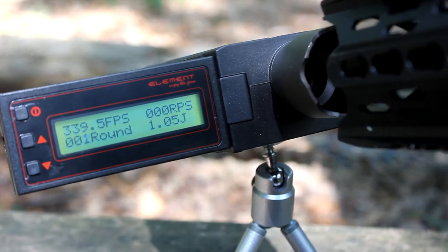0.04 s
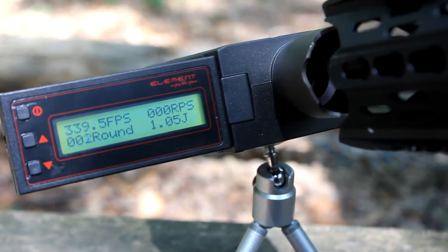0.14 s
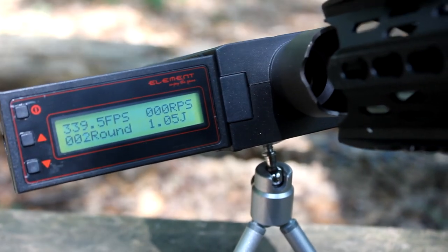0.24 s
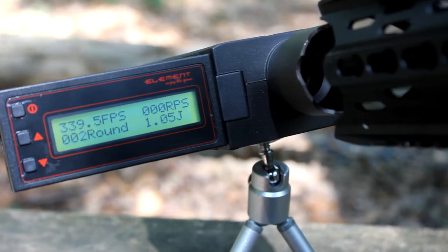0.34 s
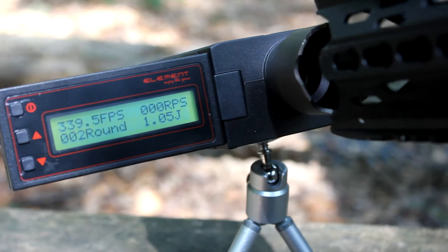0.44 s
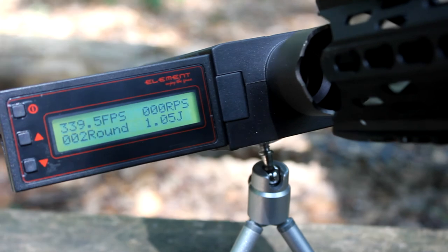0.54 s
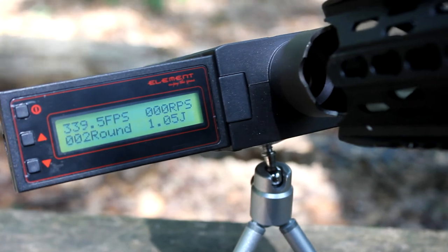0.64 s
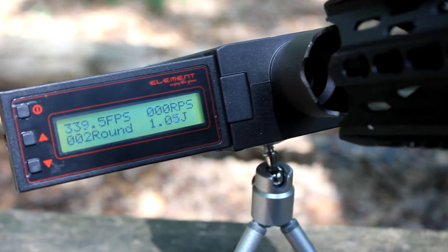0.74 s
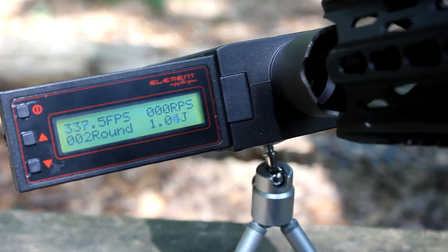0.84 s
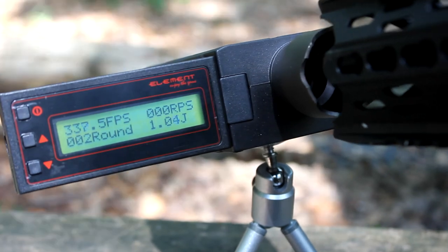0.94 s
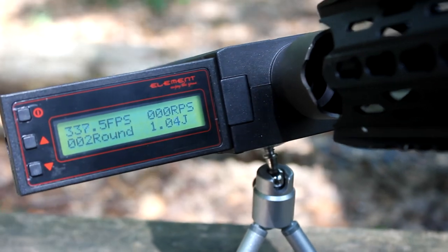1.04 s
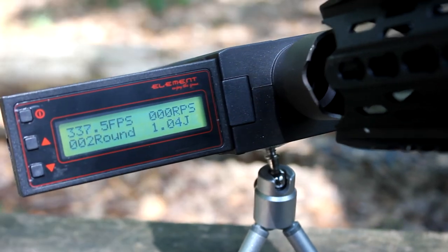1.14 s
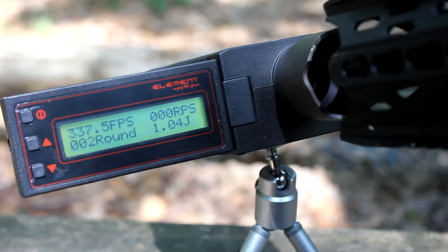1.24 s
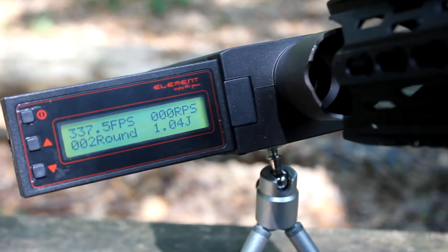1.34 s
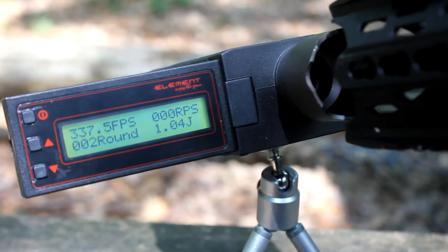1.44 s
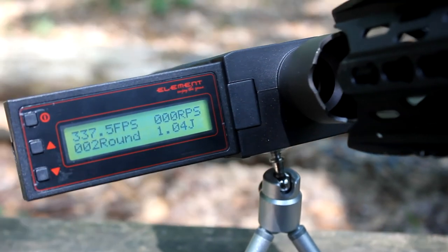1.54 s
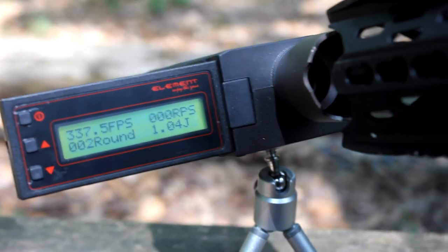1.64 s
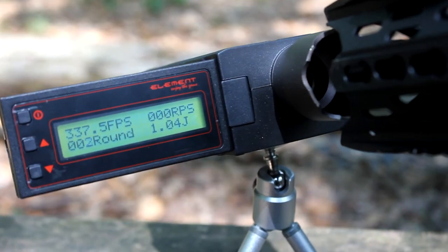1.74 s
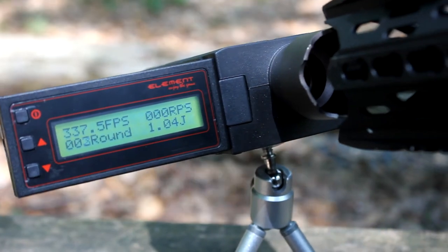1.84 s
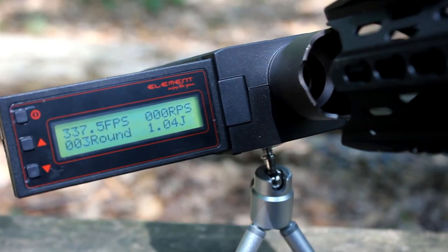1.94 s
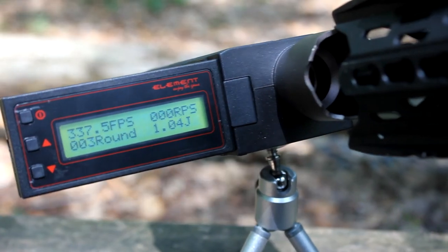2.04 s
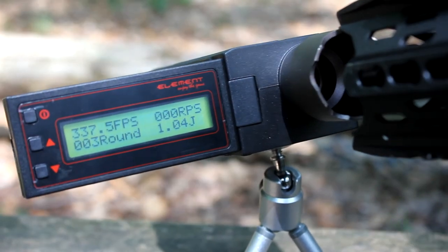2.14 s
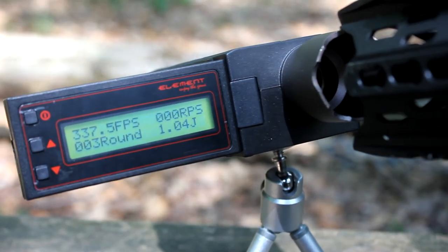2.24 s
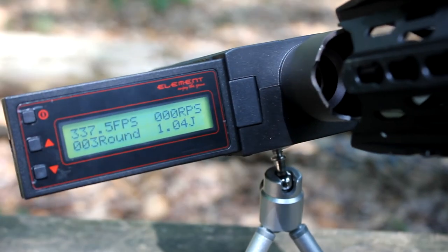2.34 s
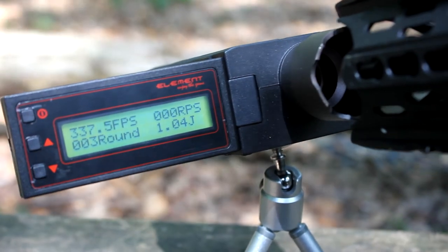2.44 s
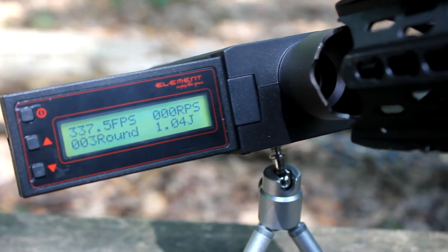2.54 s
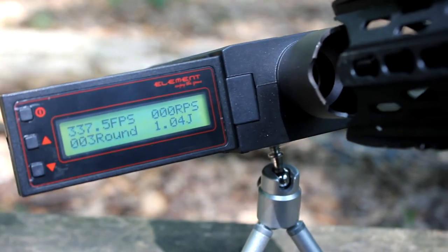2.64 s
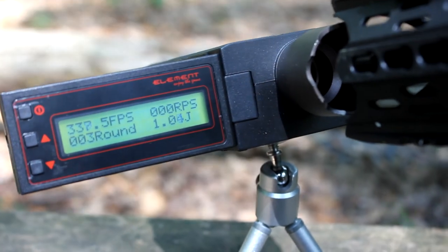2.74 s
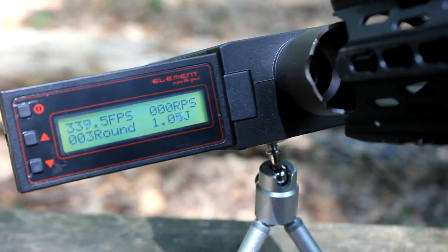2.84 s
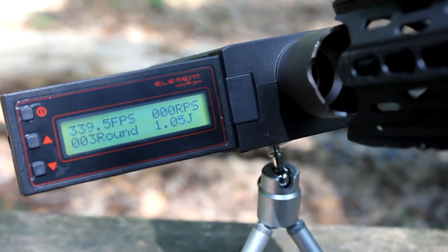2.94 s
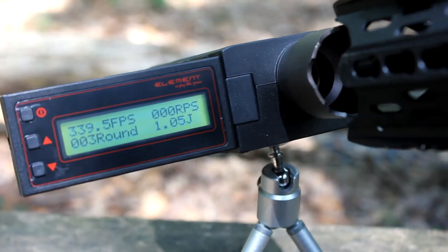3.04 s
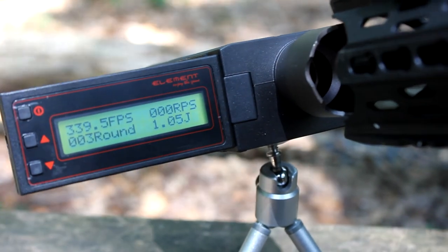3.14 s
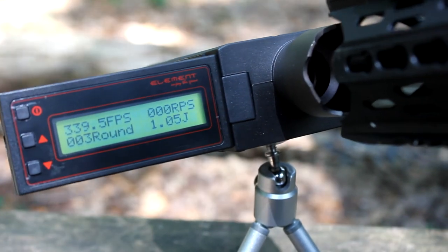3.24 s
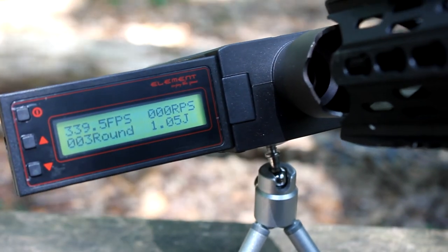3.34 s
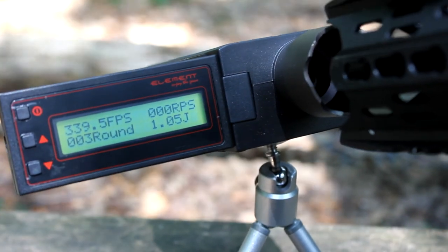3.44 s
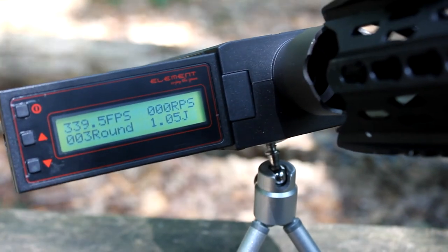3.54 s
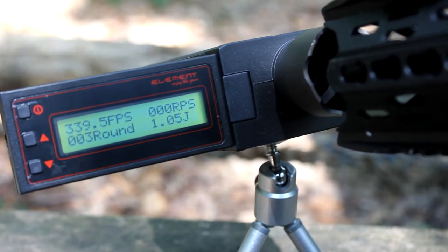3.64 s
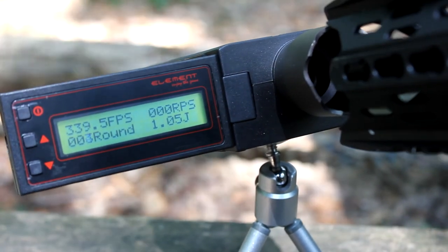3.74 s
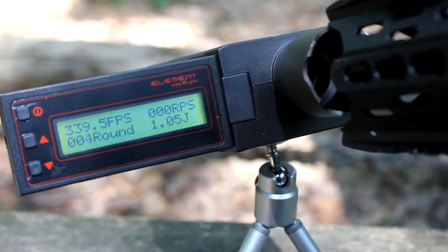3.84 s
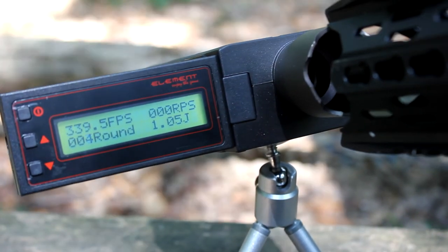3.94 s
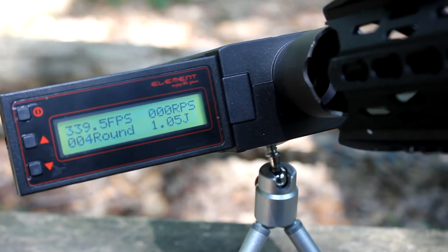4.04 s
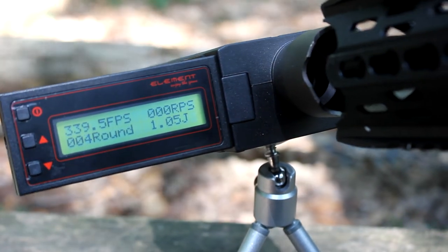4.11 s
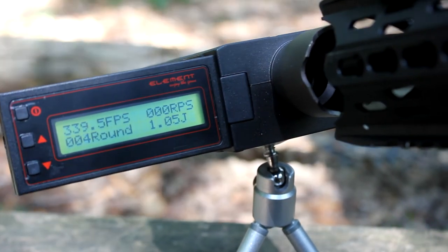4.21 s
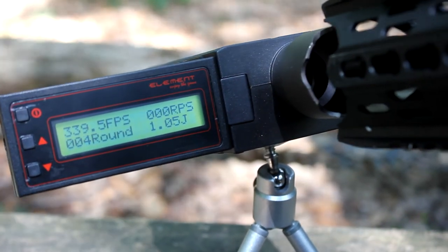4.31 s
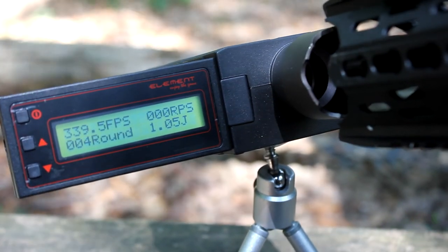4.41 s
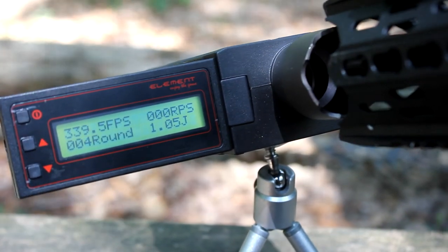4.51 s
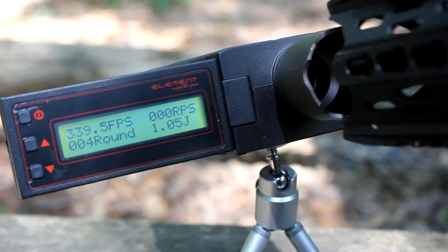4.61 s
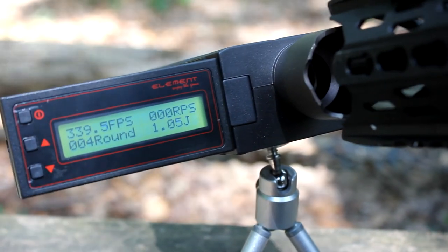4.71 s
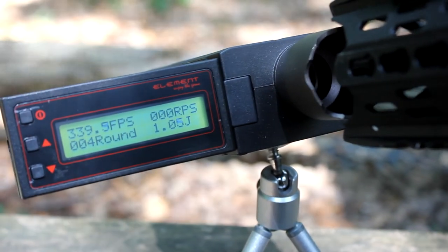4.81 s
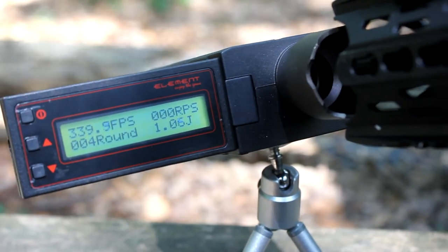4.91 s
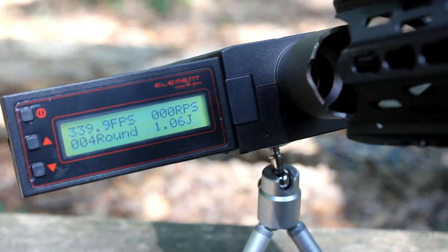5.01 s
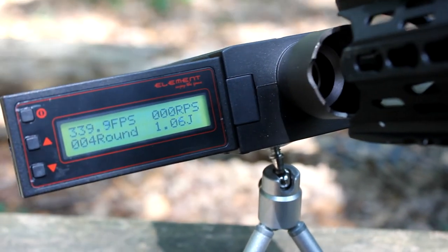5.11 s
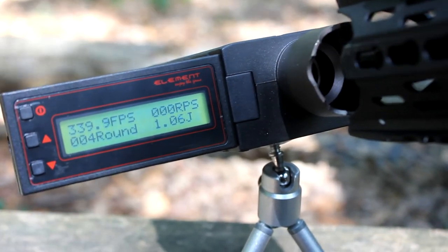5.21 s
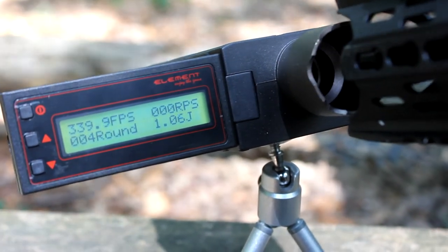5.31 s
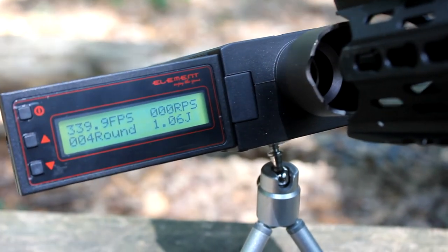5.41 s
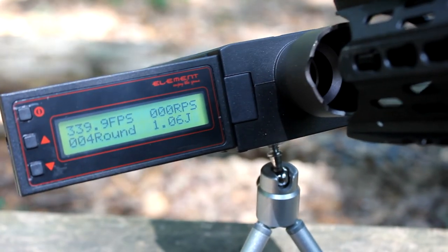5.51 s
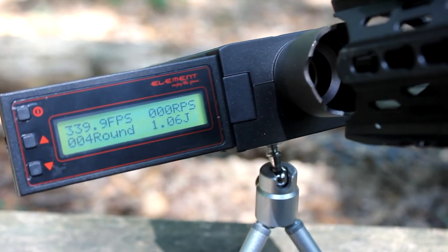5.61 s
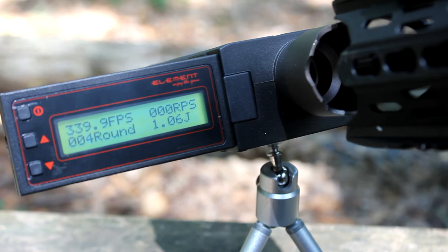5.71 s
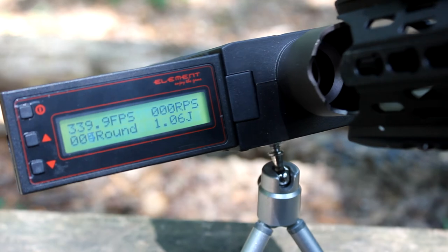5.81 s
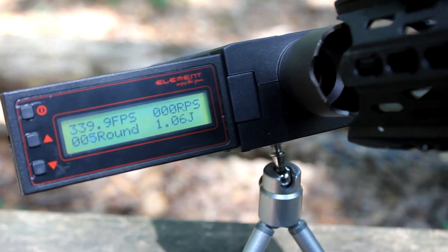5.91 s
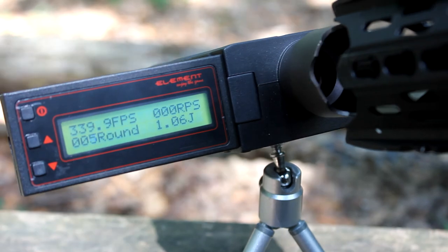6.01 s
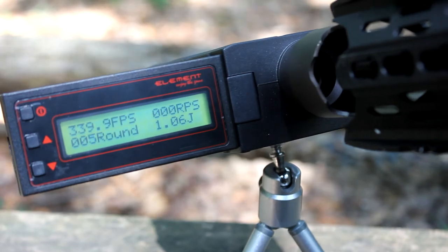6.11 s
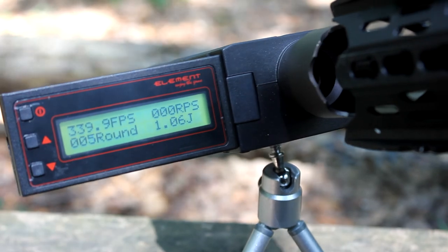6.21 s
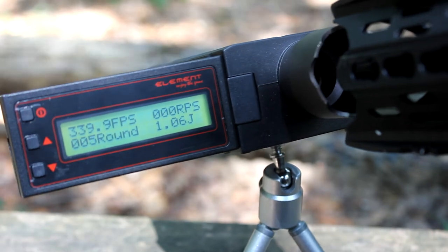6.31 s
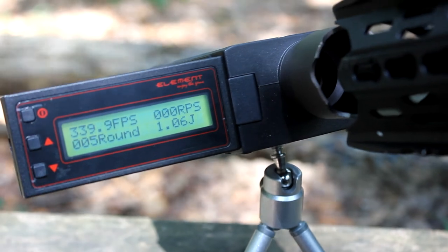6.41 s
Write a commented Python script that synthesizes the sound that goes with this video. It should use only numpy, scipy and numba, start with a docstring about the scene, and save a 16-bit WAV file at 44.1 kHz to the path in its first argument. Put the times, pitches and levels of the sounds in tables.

```python
"""Electric airsoft rifle in a wood.

Four single shots, close by. In each the motor spins up, gears whine as they draw the piston,
the piston slams home, the pellet hits a backstop, the gears coast and the leaves return a hiss.
Around them: breeze in the leaves, a distant motor, birds, ticks from handling the rifle.
The camera rumbles and bumps in the hand; its gain control ducks on each shot, then recovers."""
import sys
import numpy as np
from scipy import signal
from scipy.fft import rfft, irfft
from scipy.io import wavfile
from scipy.ndimage import uniform_filter1d
from numba import njit

SR = 44100
rng = np.random.default_rng(int(sys.argv[2]) if len(sys.argv) > 2 else 0)


def int16_out(signal):
    """Quantize to a 16-bit WAV file."""
    q = np.round(np.clip(np.atleast_2d(signal).T, -1, 1) * 32767)
    wavfile.write(sys.argv[1], SR, q.astype(np.int16))


N = 284886
TIME = np.arange(N) / SR

# leaf hiss spectrum: freq_hz, gain_db
LEAF_SPECTRUM = [(18, -63.5), (30, -44), (66, -15), (114, -12.5), (156, -3.5), (187, -6), (315, -5.5),
                 (341, -6), (546, -10.5), (691, -10.5), (830, -11), (1260, -11), (5040, -12),
                 (12300, -27.5), (15500, -30.5)]
# hand rumble spectrum: freq_hz, gain_db
RUMBLE_SPECTRUM = [(20, -15.5), (45, -1.5), (90, 2.5), (160, -8), (300, -20), (700, -43)]
# grip shifts: centre_s, half_width_s, level_db
GRIPS = [(2.25, .2, -50), (4.0, 0.3, -42), (4.79, 0.042, -30.5), (5.07, 0.13, -38.5), (5.6, 0.46, -55.5)]
# soft bumps on the camera: start_s, level_db, pitch_hz
BUMPS = [(1.842, -28.5, 120), (2.103, -28, 144), (2.23, -30, 132), (2.335, -36, 109), (2.965, -35, 85),
         (3.674, -25.5, 94), (3.935, -29.5, 130), (3.96, -17.5, 110), (4.105, -20, 148), (4.197, -29, 113),
         (4.982, -26.5, 109), (5.037, -23.5, 150), (5.065, -27, 170), (5.445, -35, 55.3), (5.61, -35, 58.7),
         (5.9, -39, 76.6)]
# shots: strike_s, gearbox_db, speed_ratio, cycle_length_ratio, pellet_round_trip_s, pellet_db
SHOTS = [(.6085, 1.5, .99, .985, .0226, 2.5), (2.551, 3, 1.017, 1.015, .0229, 3),
         (4.6307, 1.5, 1.0, .985, .0225, .5), (6.369, 2, 1.005, 1.0, .0228, 1.5)]
# body radiation of the tooth harmonics: freq_hz, gain_db
WHINE_SPECTRUM = [(250, -14), (550, -7), (850, 4), (980, 2), (1130, -11), (1570, -10.5), (2000, -13),
                  (2250, -13), (2600, -3), (3200, -1), (3600, 1), (4100, -1), (4750, -5.5), (5400, -11),
                  (6250, -7.5), (7800, -22)]
# sliding teeth and brushes: freq_hz, gain_db
RASP_SPECTRUM = [(30, -38.5), (120, -14), (400, -18), (600, -11), (900, 1.5), (1400, 0), (2300, 3.5),
                 (3700, 4), (5500, 3), (7000, -8.5), (9500, -12.5), (13500, -3.5), (16000, -9)]
# gearbox blows: from_strike_s, level_db, t60_s, lowpass_hz
BLOWS = [(-.0862, -23.5, 0.079, 1500), (-.0085, -9, 0.03, 1090), (-.0058, -9, 0.019, 5940),
         (-.0016, 9.5, 0.014, 12800), (.0035, 2.5, 0.0078, 11000), (0.0329, -26, 0.017, 3000),
         (0.0944, -25, 0.026, 1100)]
# gearbox shell modes: freq_hz, level_db
SHELL_MODES = [(290, -1), (760, 4), (1080, -2), (1260, -8), (1560, 7), (1920, -5), (2300, -2), (2950, -55),
               (3550, 14.5), (4080, 9.5), (4700, -7.5), (5300, 3), (6300, -42), (11800, 11)]
# crack of a blow: freq_hz, gain_db
CRACK_SPECTRUM = [(30, -65.5), (100, -23), (300, -10), (550, -9.5), (1100, -5), (2300, 1), (4500, 4.5),
                  (7000, -5.5), (10000, -10), (12000, -2), (16000, -24)]
# pellet impact: freq_hz, gain_db
PELLET_SPECTRUM = [(200, -14), (1500, -23), (2000, -4), (2350, -10), (2850, -1.5), (3250, 5), (3800, 2.5),
                   (4700, 1.5), (6500, -3), (9000, -12), (12000, -10), (16000, -25)]
# rebounding pellet lands: start_s, tick_db, ring_hz, ring_db
REBOUNDS = [(.7262, -15.5, 1250, -15.5)]
# scatter off trunks and leaves, mostly treble: freq_hz, gain_db
SCATTER_SPECTRUM = [(150, -23), (900, -8), (2000, -6), (3600, 0), (5500, -6), (8000, -10.5), (15000, -26)]
# near birds, single whistles: start_s, length_s, start_hz, end_hz, level_db
CHIRPS = [(1.071, 0.088, 6800, 6570, -47), (1.167, 0.082, 4670, 4510, -41.5),
          (1.3, 0.035, 3650, 4070, -38.5), (1.328, 0.028, 4050, 4025, -36.5),
          (1.435, .039, 3650, 4500, -37), (1.883, .04, 5500, 6010, -41), (2.071, .045, 4250, 3090, -43)]
# rifle handling ticks: start_s, level_db, ring_hz
TICKS = [(2.318, -45, 11000), (2.391, -33, 15500), (3.338, -43, 10900), (4.267, -44, 11000),
         (5.51, -44, 11000)]
# far bird, a sinking run of syllables: start_s, foot_hz, slur_db, low_note_db
SYLLABLES = [(4.899, 4430, -45.5, -43), (5.045, 4420, -48.5, -41), (5.185, 4270, -44, -43),
             (5.313, 4070, -41.5, -35), (5.458, 3497, -40, -34.5), (5.585, 3256, -37, -37),
             (5.725, 3100, -37, -39.5), (5.86, 2900, -35, -41), (6.004, 2730, -33.5, -45),
             (6.13, 2696, -34, -42)]

# nominal gearbox cycle, piston strike at 0; each shot scales its length and speed
START_S, PICKUP_S, RELEASE_S, CUTOFF_S, OVERRUN_S = -.086, -.0745, -.0125, .026, .0493
FIRST_TOOTH_HZ, FULL_TOOTH_HZ = 195, 1605
TOP_HZ = 15900


def undb(db):
    """Decibels to gain."""
    return 10 ** (np.asarray(db) / 20)


def unit(x):
    """Scale to rms 1."""
    return x / np.sqrt(np.mean(x ** 2))


def response(spectrum, hz):
    """Gain of a (freq_hz, gain_db) table at hz."""
    freq_hz, gain_db = np.transpose(spectrum)
    return undb(np.interp(np.log(np.maximum(hz, 1)), np.log(freq_hz), gain_db))


def convolve(x, kernel):
    """Convolve with the kernel scaled to unit energy."""
    return signal.fftconvolve(x, kernel / np.linalg.norm(kernel))[:len(x)]


def colour(x, spectrum, taps=2048):
    """Minimum-phase filter; white noise keeps its power."""
    cepstrum = irfft(np.log(response(spectrum, np.arange(taps // 2 + 1) * SR / taps)))
    causal = np.r_[cepstrum[0], 2 * cepstrum[1:taps // 2]]
    return convolve(x, irfft(np.exp(rfft(causal, taps))))


def lowpass(x, hz, order):
    """Maximally flat low-pass."""
    return signal.sosfilt(signal.butter(order, hz, fs=SR, output="sos"), x)


def walk(rate_hz, size):
    """Smooth random drift, spread near 1."""
    step = max(int(SR / rate_hz), 1)
    stairs = np.repeat(rng.standard_normal(size // step + 2), step)
    return unit(uniform_filter1d(stairs, step))[:size]


def chatter(size):
    """Micro-contacts: equal strength, random sign."""
    return np.sign(rng.standard_normal(size))


def fade(t, t60_s):
    """Exponential decay from t = 0."""
    return (t >= 0) * np.exp(-np.log(1000) * np.maximum(t, 0) / t60_s)


def gate(t, on_s, off_s, attack_s, t60_s):
    """Ramp from on_s, hold, decay from off_s."""
    return np.clip((t - on_s) / attack_s, 0, 1) * fade(np.maximum(t - off_s, 0), t60_s)


def swell(t, centre_s, half_width_s):
    """Bell curve, peak 1."""
    return np.exp(-((t - centre_s) / half_width_s) ** 2)


def add(out, start_s, x):
    """Mix x into out at start_s."""
    i = int(start_s * SR)
    out[i:i + len(x)] += x[:max(N - i, 0)]


def leaves(gust_db=-40.5, lull_db=-45, drop_s=2.26, drop_width_s=.45, sway_db=.28):
    """Leaves hiss in a breeze that drops once, gust to lull."""
    drop = (1 + np.tanh((TIME - drop_s) / (2 * drop_width_s))) / 2
    breeze_db = gust_db + (lull_db - gust_db) * drop
    hiss = colour(rng.standard_normal(N), LEAF_SPECTRUM)
    return hiss * undb(breeze_db - sway_db * walk(4.66, N))


def distant_motor(pitch_hz=161.5, drift=.011, level_db=-51, sway_db=2):
    """A wavering hum swells and fades."""
    hz = pitch_hz * (1 + drift * walk(32, N))
    hum = unit(np.sin(2 * np.pi * np.cumsum(hz) / SR))
    return hum * swell(TIME, centre_s=2, half_width_s=1.58) * undb(level_db + sway_db * walk(3.8, N))


def camera_handling(rest_db=-56, flutter_db=3, scuff_db=-16, scuff_hz=320, rise_cycles=.41):
    """Fluttering rumble swells as the grip shifts; dull bumps of a cycle or two scuff a little."""
    grip = undb(rest_db) + sum(undb(db) * swell(TIME, s, width_s) for s, width_s, db in GRIPS)
    rumble = unit(colour(rng.standard_normal(N), RUMBLE_SPECTRUM))
    out = rumble * grip * undb(flutter_db * (walk(25, N) - .5))
    t = TIME[:SR // 10]
    for start_s, db, hz in BUMPS:
        scuff = undb(scuff_db) * unit(lowpass(rng.standard_normal(len(t)), scuff_hz, order=4))
        rise = t * hz / rise_cycles
        envelope = rise * np.exp(1 - rise)
        add(out, start_s, undb(db) * envelope * (np.sin(2 * np.pi * hz * t) + scuff))
    return out


def rifle_motor(t, spin_up_s=.057, sag_hz=60, coast_tau_s=.041):
    """Nominal tooth rate and spring draw (0-1): spin up, sag against the spring, run free, coast."""
    draw = np.clip((t - PICKUP_S) / (RELEASE_S - PICKUP_S), 0, 1)
    spun = np.sin(np.pi / 2 * np.clip((t - START_S) / spin_up_s, 0, 1))
    strain = draw ** 2 * np.clip(t / RELEASE_S, 0, 1)
    driven_hz = FIRST_TOOTH_HZ + (FULL_TOOTH_HZ - FIRST_TOOTH_HZ) * spun - sag_hz * strain
    coast = np.exp(-np.maximum(t - CUTOFF_S, 0) / coast_tau_s)
    return driven_hz * coast, draw


def gear_load(t, tooth_hz, draw, drawn_db=-10.5, slack_db=-6.5):
    """Whine and rasp gains: gears run free, draw the spring, let the piston slide, overrun the motor."""
    free = (t >= START_S) * (tooth_hz / FULL_TOOTH_HZ) ** .59
    free *= fade(np.maximum(t - OVERRUN_S, 0), t60_s=.14)
    driven = gate(t, START_S, RELEASE_S, attack_s=.009, t60_s=.05)
    drawing = gate(t, PICKUP_S, RELEASE_S, attack_s=.0024, t60_s=.05)
    sliding = gate(t, RELEASE_S, off_s=.0033, attack_s=.0088, t60_s=.031)
    overrun = swell(t, OVERRUN_S, half_width_s=.015)
    spring_db = drawn_db + slack_db * (1 - draw)
    whine = undb(-43) * free + undb(spring_db) * driven + undb(-22.5) * overrun
    rasps = [undb(-27) * free, undb(-19) * drawing, undb(-11) * sliding, undb(-29.5) * overrun]
    return whine, np.linalg.norm(rasps, axis=0)


def gears(t, speed, wobble=.008, backlash=.04, rough=.22, poles_db=-23, bite=.71, eccentric=.2):
    """Teeth whine in harmonics and rasp once a tooth; the ten-tooth pinion runs off centre."""
    nominal_hz, draw = rifle_motor(t)
    whine_gain, rasp_gain = gear_load(t, nominal_hz, draw)
    tooth_hz = speed * nominal_hz
    pace = tooth_hz / tooth_hz.max()
    jitter = (wobble + backlash * (1 - pace)) * walk(900, len(t))  # teeth rattle until up to speed
    tooth_phase = 2 * np.pi * np.cumsum(tooth_hz * (1 + jitter)) / SR
    shaft_phase = tooth_phase / 10 + rng.uniform(0, 2 * np.pi)
    whine = undb(poles_db) * np.sin(3 * shaft_phase)  # three motor poles tug each turn
    for k in range(1, 6):
        harmonic = response(WHINE_SPECTRUM, k * tooth_hz) * np.sin(k * tooth_phase + rng.uniform(0, 2 * np.pi))
        hardness = pace ** max(k - 2, 0)  # faster teeth meet harder: more overtones
        whine += harmonic * hardness * (1 + rough * walk(700, len(t)))
    friction = rng.standard_normal(len(t)) * (1 + bite * np.cos(tooth_phase))
    rasp = colour(friction, RASP_SPECTRUM)
    return (1 + eccentric * np.sin(shaft_phase)) * (whine_gain * whine + rasp_gain * rasp)


def blows(t, push_s=.00067, shell_t60_s=.014, ring_db=-6):
    """Motor kick, piston release, slam, bounce and latch: each cracks and rings the gearbox shell."""
    force = 0
    for start_s, db, t60_s, lowpass_hz in BLOWS:
        contact = unit(lowpass(chatter(len(t)), lowpass_hz, order=2))
        force += undb(db) * gate(t, start_s, start_s + push_s, push_s, t60_s) * contact
    age = t - t[0]
    modes = sum(undb(db) * rng.choice([-1, 1]) * np.cos(2 * np.pi * hz * age) for hz, db in SHELL_MODES)
    ring = convolve(force, modes * fade(age, shell_t60_s))
    return undb(ring_db) * ring + colour(force, CRACK_SPECTRUM)


def pellet(t60_s=.0079, push_s=.00017, tail_db=-24):
    """A light plastic ball strikes: a short, bright tick."""
    t = TIME[:SR // 20]
    envelope = gate(t, 0, push_s, push_s, t60_s) + undb(tail_db) * fade(t, t60_s=.026)
    return colour(chatter(len(t)) * envelope, PELLET_SPECTRUM)


def rifle():
    """One gearbox cycle and one pellet per shot; the first pellet rebounds."""
    out = np.zeros(N)
    t = np.arange(-.092, .14, 1 / SR)
    for strike_s, gearbox_db, speed, stretch, round_trip_s, pellet_db in SHOTS:
        gearbox = gears(t / stretch, speed) + blows(t / stretch)
        add(out, strike_s + t[0], undb(gearbox_db) * gearbox)
        add(out, strike_s + round_trip_s, undb(pellet_db) * pellet())
    age = TIME[:SR // 20]
    for start_s, tick_db, ring_hz, ring_db in REBOUNDS:
        knock = undb(ring_db) * fade(age, t60_s=.021) * np.sin(2 * np.pi * ring_hz * age)
        add(out, start_s, undb(tick_db) * pellet(t60_s=.023) + knock)
    return out


def leaf_echo(x, t60_s=.94, rise_s=.019):
    """Countless leaves return a shot's energy as a smooth, dying hiss."""
    t = TIME[:SR]
    arrivals = (fade(t, t60_s) * (1 - np.exp(-t / rise_s))) ** 2
    energy = np.abs(signal.fftconvolve(x ** 2, arrivals / arrivals.sum())[:N])
    return np.sqrt(energy) * colour(rng.standard_normal(N), SCATTER_SPECTRUM)


def whistle(length_s, start_hz, end_hz, db):
    """One bird glide; wider sweeps are burrier."""
    progress = np.linspace(0, 1, int(length_s * SR))
    burr = .01 + .06 * abs(np.log(end_hz / start_hz))
    hz = start_hz * (end_hz / start_hz) ** progress * (1 + burr * walk(600, len(progress)))
    envelope = np.sqrt(np.abs(np.sin(np.pi * progress)))
    return undb(db) * envelope * np.sin(2 * np.pi * np.cumsum(hz) / SR)


def trunk_echo(x, t60_s, rise_s):
    """Scatter from many trunks builds and dies away."""
    t = TIME[:SR]
    return convolve(x, rng.standard_normal(SR) * fade(t, t60_s) * (1 - np.exp(-t / rise_s)))


def birds(near_direct_db=-.5, far_direct_db=-16, echo_db=2):
    """Near chirps and a far song, heard largely by way of the trees."""
    near, far = np.zeros(N), far_song()
    for start_s, length_s, start_hz, end_hz, db in CHIRPS:
        add(near, start_s, whistle(length_s, start_hz, end_hz, db))
    close_trunks = .75 * trunk_echo(near + far, t60_s=.3, rise_s=.004)
    deep_wood = .65 * trunk_echo(near + far, t60_s=1.1, rise_s=.03)
    direct = undb(near_direct_db) * near + undb(far_direct_db) * far
    return direct + undb(echo_db) * (close_trunks + deep_wood)


def rifle_ticks(t60_s=.011, crack_db=-5):
    """The handled rifle ticks: tiny cracks with a narrow, high ring."""
    out, t = np.zeros(N), TIME[:SR // 20]
    for start_s, db, hz in TICKS:
        contact = chatter(len(t)) * fade(t, t60_s)
        ring = colour(contact, [(.8 * hz, -30), (hz, 0), (1.2 * hz, -30)])
        add(out, start_s, undb(db) * (ring + undb(crack_db) * contact))
    return out


def far_song(first_top_hz=6200, sink_hz_per_s=520, slur_s=.095, note_delay_s=.044, note_s=.031):
    """Each syllable starts lower and slurs down to its foot, over a short low note."""
    out = np.zeros(N)
    for start_s, foot_hz, slur_db, note_db in SYLLABLES:
        top_hz = first_top_hz - sink_hz_per_s * (start_s - SYLLABLES[0][0])
        add(out, start_s, whistle(slur_s, top_hz, foot_hz, slur_db))
        add(out, start_s + note_delay_s, whistle(note_s, foot_hz, .962 * foot_hz, note_db))
    return out


def scene():
    """Rifle close by, wood all around; mono."""
    shots = rifle()
    mix = shots + undb(-26) * leaf_echo(shots) + birds() + camera_handling() + rifle_ticks()
    return (mix + leaves() + distant_motor())[None]


@njit
def ducking(excess_db, attack_s, hold_s, release_s):
    """Gain reduction in dB: rises fast with the excess, holds, relaxes."""
    out, cut_db, wait_s = np.empty(len(excess_db)), 0., 0.
    for i in range(len(excess_db)):
        wait_s = hold_s if excess_db[i] > 0 else wait_s - 1 / SR
        if excess_db[i] > cut_db:
            cut_db += (excess_db[i] - cut_db) / (attack_s * SR)
        elif wait_s < 0:
            cut_db -= cut_db / (release_s * SR)
        out[i] = cut_db
    return out


def record(dry, threshold_db=-17, ceiling=.76):
    """Camera gain control, soft overload and treble cut-off."""
    level_db = 10 * np.log10(np.abs(uniform_filter1d(dry[0] ** 2, size=128)) + 1e-12)
    excess_db = np.maximum(level_db - threshold_db, 0)
    ducked = dry * undb(-ducking(excess_db, attack_s=.0067, hold_s=.13, release_s=.2))
    rounded = ceiling * np.tanh(ducked / ceiling)
    return signal.sosfiltfilt(signal.ellip(10, .1, 60, TOP_HZ, fs=SR, output="sos"), rounded)


dry = scene()
out = record(dry)
int16_out(out)
```